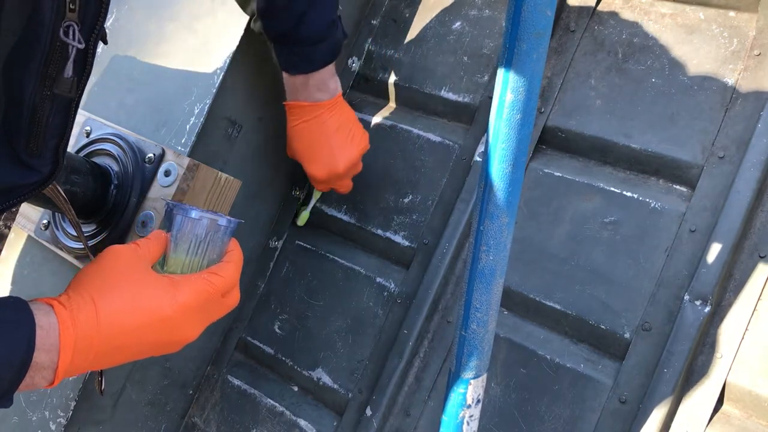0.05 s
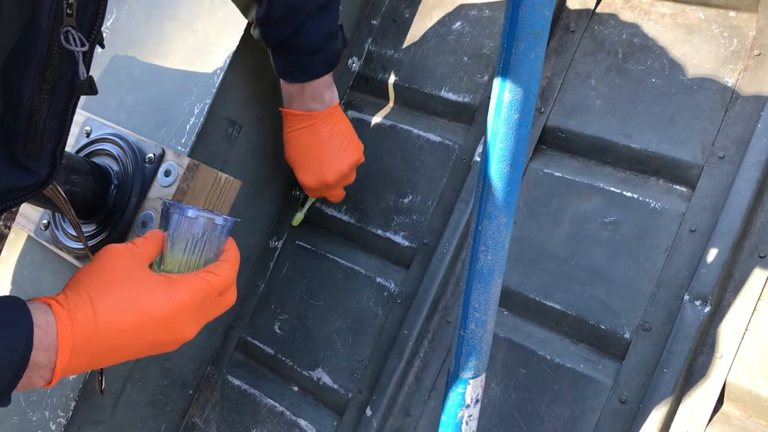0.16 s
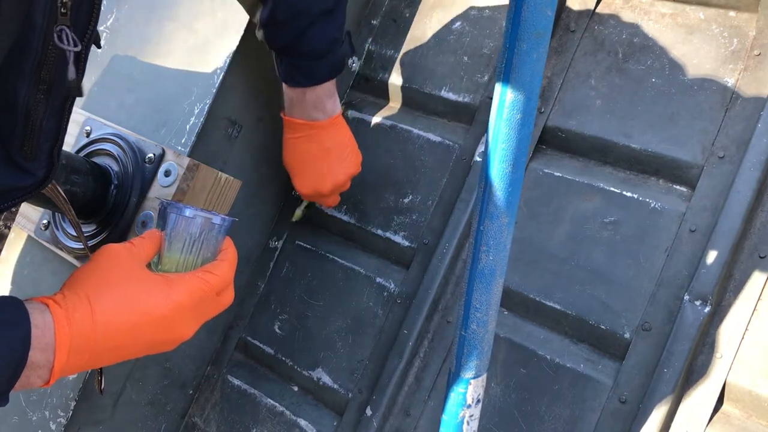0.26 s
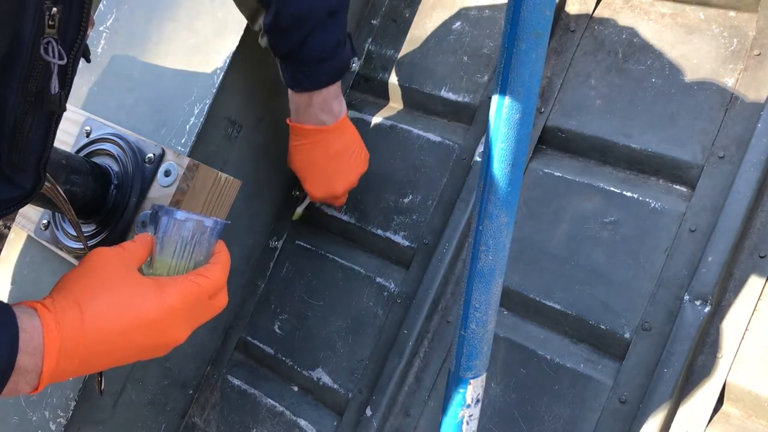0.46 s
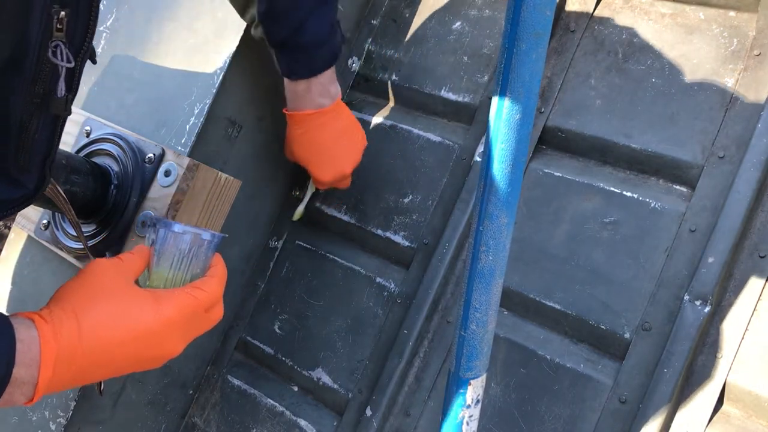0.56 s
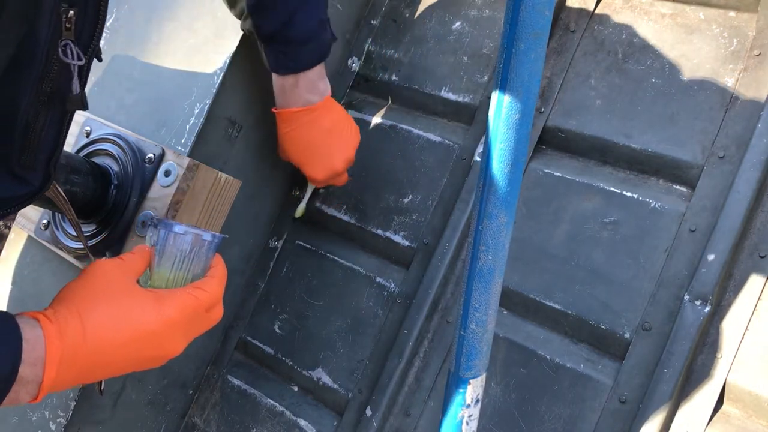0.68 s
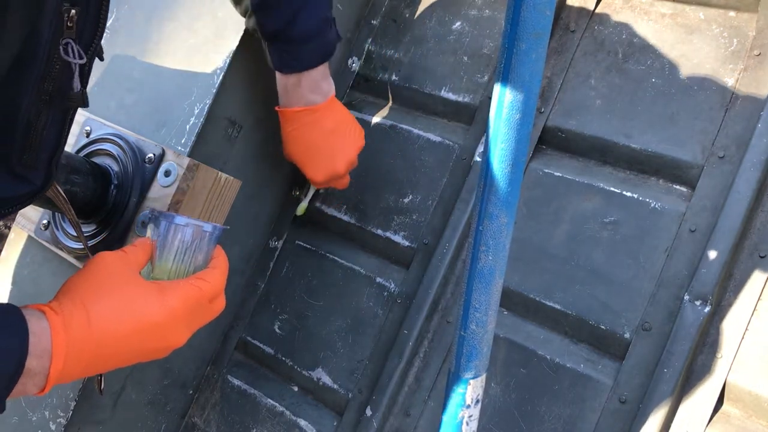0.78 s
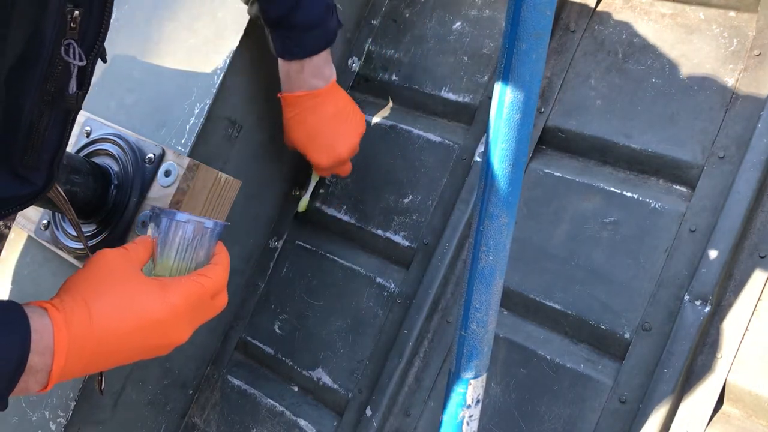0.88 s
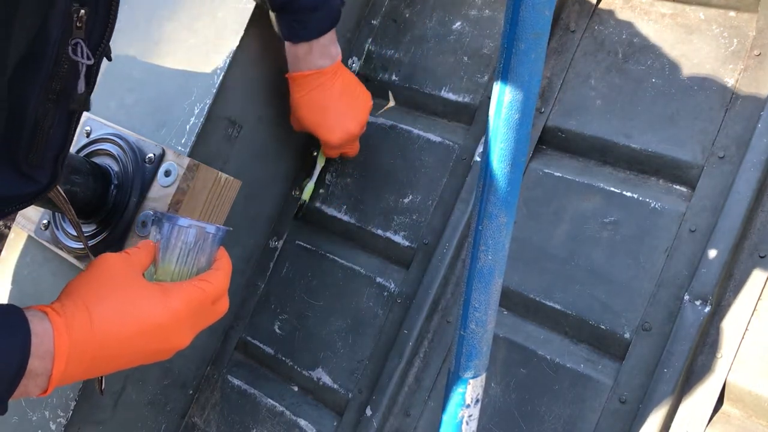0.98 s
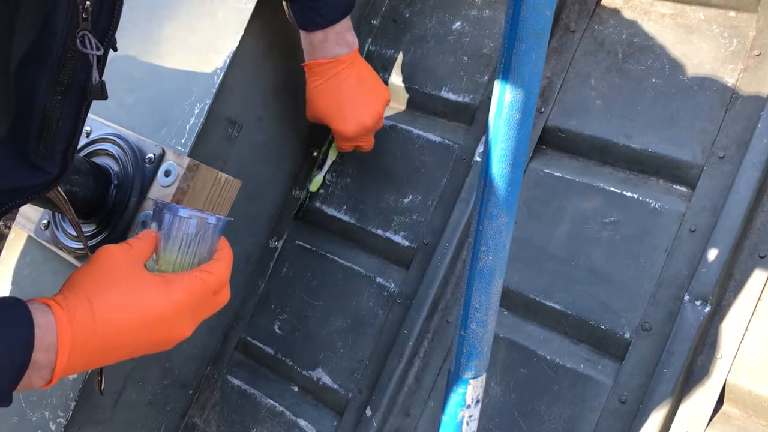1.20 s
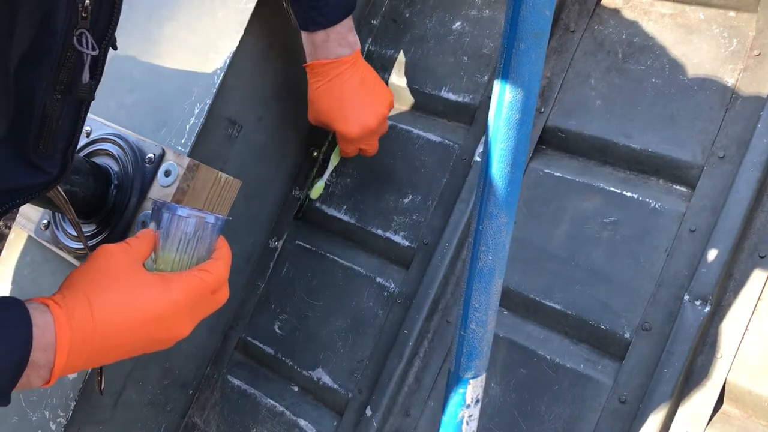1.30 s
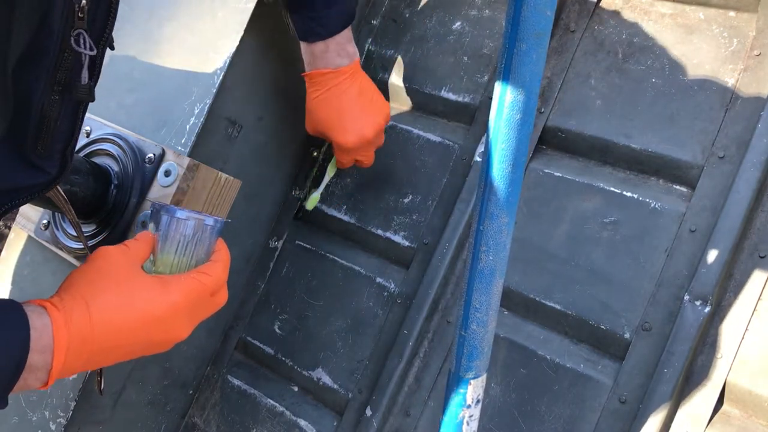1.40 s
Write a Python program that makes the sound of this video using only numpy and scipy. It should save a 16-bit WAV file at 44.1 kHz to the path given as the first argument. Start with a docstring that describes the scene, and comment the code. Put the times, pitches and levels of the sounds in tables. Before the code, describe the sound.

Close up in a soft outdoor setting, brush bristles scrape thin sheet metal in bursts with low hollow booms and tiny sticky snaps; later the metal collar rasps twice, and a faint ringing rub follows.

```python
"""An outdoor shop, with soft air: a stiff brush scrubs sticky epoxy along the ribs of an aluminium hull.
Random bristle slips excite the resonances of the sheet, the bristles and the tips; slower shoves boom the hull.
Glue ticks are decaying noise bands, handle knocks are pulses into hull modes, and catches jolt the sheet.
Twice the brush's metal collar rasps over a rib, driving narrow resonances; a faint ringing rub comes near
the end. One close microphone feeds both channels."""
import sys
import numpy as np
from scipy import signal
from scipy.fft import rfft, irfft, next_fast_len
from scipy.io import wavfile
from scipy.ndimage import uniform_filter1d

SR = 44100
rng = np.random.default_rng(int(sys.argv[2]) if len(sys.argv) > 2 else 0)


def ratio(d):
    """dB to gain"""
    e = np.asarray(d, float) / 20
    return 10 ** e


def waveform_to_disk(signal):
    """Save audio, clipped to [-1, 1], as 16-bit WAV at the path in sys.argv[1]."""
    frames = np.transpose(np.atleast_2d(signal))
    scaled = np.clip(frames, -1, 1) * 32767
    samples = np.round(scaled).astype(np.int16)
    wavfile.write(sys.argv[1], SR, samples)


N = 63945  # length [samples]


def unit(x):
    """Normalisation: scale to rms 1."""
    return x / np.sqrt(np.mean(x ** 2) + 1e-20)


def filtered(x, response):
    """Linear filtering: the spectrum of x times a complex response of frequency."""
    size = next_fast_len(x.shape[-1] + SR // 4)
    spectrum = rfft(x, size) * response(np.fft.rfftfreq(size, 1 / SR))
    return irfft(spectrum, size)[..., :x.shape[-1]]


def curve(points):
    """Zero-phase spectral shaping: (frequency [Hz], level [dB]) points joined on a log frequency axis."""
    hz, db = np.transpose(points)
    return lambda f: ratio(np.interp(np.log(f + 1), np.log(hz + 1), db))


def resonant(peaks):
    """Modal superposition: damped second-order resonances of alternating sign, causal."""
    def response(f):
        total = 0
        for k, (centre, width, db) in enumerate(peaks):
            damping = 1j * f * width
            total = total + (-1) ** k * ratio(db) * damping / (centre ** 2 - f ** 2 + damping)
        return total
    return response


def slips(rate, spread_db, smooth):
    """Stick-slip friction: random impulses (rate per s) of uneven size; smooth is the power share of even noise."""
    hit = rng.random(N) < rate / SR
    sizes = ratio(spread_db * rng.standard_normal(N))
    grains = unit(hit * rng.choice([-1, 1], size=N) * sizes)
    return np.sqrt(1 - smooth) * grains + np.sqrt(smooth) * rng.standard_normal(N)


def patchy(x):
    """Random modulation: bristles of different stiffness come and go in patches of time and frequency."""
    depth_db = 1  # rms of the gain
    z = signal.stft(x, nperseg=256)[2]
    across_hz = uniform_filter1d(rng.standard_normal(z.shape), 4, 0)
    field = uniform_filter1d(across_hz, 5, 1)
    return unit(signal.istft(z * ratio(depth_db * unit(field)), nperseg=256)[1][:N])


def swell(start, rise, hold, fall, db):
    """Envelope of a contact: smooth rise, hold and fall."""
    ramp = np.interp(np.arange(N) / SR, np.cumsum([start, rise, hold, fall]), [0, 1, 1, 0])
    return ratio(db) * np.sin(ramp * np.pi / 2) ** 2


def driven(gain, force, response):
    """Forced vibration: an enveloped force shakes a body whose output is rms 1 at steady gain 1."""
    return filtered(gain * force, response) / np.std(filtered(force, response))


# Spectrum of the background air: (frequency [Hz], relative density [dB per Hz])
AIR_SPECTRUM = [(15, -34), (25, 8.5), (87, 4), (195, -9.5), (415, -15), (816, -10.5), (2040, -26),
                (2680, -31), (10300, -37), (12800, -36.5), (15900, -35)]


def air():
    """Stationary noise: white noise shaped into the steady background of the place."""
    rms_db = -54
    return ratio(rms_db) * unit(filtered(rng.standard_normal(N), curve(AIR_SPECTRUM)))


# Glue ticks: (time [s], onset rms of the slow decay [dB], centre [Hz], slow decay T60 [s])
GLUE_TICKS = [(0.0634, -61.5, 4400, 0.026), (0.127, -64, 5730, 0.075), (.165, -61, 8000, 0.01),
              (0.207, -54, 4500, .03), (.2995, -47.5, 4000, 0.038), (0.3005, -49.5, 6130, 0.046),
              (0.302, -50, 9100, 0.034), (0.3524, -44, 9400, 0.017), (.352, -50.5, 4940, .03),
              (0.373, -56, 8700, 0.045), (0.6857, -42.5, 10900, 0.0077), (0.6886, -56, 5350, 0.017),
              (0.7245, -52, 5040, 0.044), (.914, -55, 5500, 0.048), (1.2747, -58.5, 7700, 0.047),
              (1.297, -58, 11300, 0.013), (1.3295, -52.5, 4440, 0.067), (1.3297, -58.5, 8700, 0.033),
              (1.4341, -62.5, 7800, .02)]


def ticks():
    """Sudden release: glue threads and bristles snap free as decaying noise bands with a sharp head."""
    width = 0.5  # of each of two cascaded resonances, over the centre
    snap_db, snap_t60_s = -1, 0.0013  # sharp head, level relative to the slow decay
    out, t = np.zeros(N + SR), np.arange(SR // 20) / SR
    for time, db, hz, t60 in GLUE_TICKS:
        band = resonant([(hz, width * hz, 0)])
        noise = unit(filtered(rng.standard_normal(len(t)), lambda f: band(f) ** 2))
        decay = ratio(-60 * t / t60) + ratio(snap_db - 60 * t / snap_t60_s)
        out[round(time * SR):][:len(t)] += noise * ratio(db) * decay
    return out[:N]


# Modes of the whole hull: (centre [Hz], width [Hz], relative level [dB])
HULL_MODES = [(61.3, 22.3, -5.5), (101, 25.6, 0.5), (165.6, 30.3, -1.5), (186.3, 26.7, -1.5),
              (252.2, 27.8, -8.5), (345, 180, -17.5)]
# Handle knocks: (time [s], peak level [dB])
HANDLE_KNOCKS = [(0.232, -34.5), (.256, -32), (0.298, -23), (.36, -35.5), (0.429, -36), (.677, -33),
                 (.737, -35.5), (0.877, -32), (1.166, -35.5), (1.185, -29)]


def knocks():
    """Impulse response: short soft pushes of the handle ring the hull modes."""
    push_s = 0.0066
    t = np.arange(SR // 5) / SR
    push = (t < push_s) * np.sin(np.pi * t / push_s) ** 2
    ring = filtered(push, resonant(HULL_MODES))
    blows = np.zeros(N)
    for time, db in HANDLE_KNOCKS:
        blows[round(time * SR)] = ratio(db)
    return signal.fftconvolve(blows, -ring / np.abs(ring).max())[:N]


# Faint ringing rub near the end: (start [s], rise [s], hold [s], fall [s], level [dB])
RINGING_RUB = (1.345, .006, .05, .025, -58)
# Resonances of the rib: (centre [Hz], width [Hz], relative level [dB])
RIB_MODES = [(1620, 60, 4.5), (3530, 220, -14.5), (4450, 130, -11)]


def rub():
    """Friction-driven resonance: sparser slips ring the rib."""
    return driven(swell(*RINGING_RUB), slips(630, 2.1, 0.33), resonant(RIB_MODES))


# Collar rasps: (start [s], rise [s], hold [s], fall [s], level [dB])
COLLAR_RASPS = [(1.012, 0.046, 0.029, 0.035, -38.5), (1.118, 0.06, 0.026, 0.028, -48.5)]
# Resonances of the metal collar on the rib: (centre [Hz], width [Hz], relative level [dB])
COLLAR_MODES = [(998, 32, -1), (1270, 40, 7), (1308, 67, 5.5), (1352, 82, 4.5), (1547, 73, -2),
                (1702, 38, -2.5), (1945, 49, -2.5), (2170, 54, -11.5), (2570, 170, -10), (3400, 95, -12.5)]
# High edge of the hardest rasp: (start [s], rise [s], hold [s], fall [s], level [dB])
RASP_EDGE = (1.035, .015, .04, .015, -52)
# Its resonance: (centre [Hz], width [Hz], relative level [dB])
EDGE_MODES = [(4340, 180, 0)]


def rasps():
    """Friction-driven resonance: metal on metal slips densely into narrow modes."""
    force = slips(900, 3.3, 0.61)
    strokes = sum(swell(*row) for row in COLLAR_RASPS)
    body = driven(strokes, force, resonant(COLLAR_MODES))
    edge = driven(swell(*RASP_EDGE), force, resonant(EDGE_MODES))
    return body + edge


# Broad response of the aluminium sheet: (frequency [Hz], relative density [dB per Hz])
SHEET_CURVE = [(180, 3.5), (300, 1.5), (420, -8.5), (735, -1), (825, -6), (1010, -5), (1640, -8.5),
               (3000, -31), (3900, -68), (6600, -120)]
# Modes added on that curve: (centre [Hz], width [Hz], level relative to the curve [dB])
SHEET_MODES = [(612, 20, -11), (717, 20, -9), (992, 20, 0.5), (1305, 33, 1), (1745, 27, -7),
               (1920, 20, -39), (2540, 30, 2)]


def sheet(f):
    """Plate response: a broad curve with added modes, weakening below 200 Hz."""
    return curve(SHEET_CURVE)(f) * (1 + resonant(SHEET_MODES)(f)) * np.clip(f / 200, 0, 1) ** 2


# Bristle bunches catch on the sheet: (time [s], starting drive level [dB])
BRISTLE_CATCHES = [(.3, -50.5), (0.309, -42), (.321, -38.5), (0.334, -37.5), (.679, -49), (.689, -51),
                   (0.726, -38), (.737, -45), (0.778, -49)]


def catches():
    """Transient excitation: each catch is a short, rough, decaying jolt of the sheet."""
    t60_s = 0.049
    t, jolt = np.arange(N) / SR, np.zeros(N)
    for time, db in BRISTLE_CATCHES:
        jolt += (t >= time) * ratio(db - 60 * np.clip(t - time, 0, 1) / t60_s)
    return driven(jolt, slips(1200, 8.8, 0.48), sheet)


def hull_boom(gain):
    """Low modal excitation: sparse uneven shoves shake the whole hull."""
    return driven(gain, slips(150, 4.5, 0.63), resonant(HULL_MODES))


# Spectrum of the tip hiss: (frequency [Hz], relative density [dB per Hz])
TIP_SPECTRUM = [(4410, -7), (7500, -4), (9470, -0.5), (10400, -8), (12600, -0.5), (15900, -7)]


def tip_hiss(gain):
    """Friction noise: dense slips of the bristle tips make a high hiss."""
    return driven(gain, patchy(slips(1700, 4.5, 0.65)), curve(TIP_SPECTRUM))


# Spectrum of the bristle rasp: (frequency [Hz], relative density [dB per Hz])
BRISTLE_SPECTRUM = [(1470, -32), (2500, -2), (3050, -4), (3980, -4), (4340, -3.5), (4800, -11),
                    (6070, -7.5), (7500, -17), (9750, -70), (16500, -120)]


def bristle_rasp(gain, force):
    """Friction noise: the slip force shaped by the spectrum of the bristles."""
    return driven(gain, force, curve(BRISTLE_SPECTRUM))


# Brush strokes: (time [s], scrape level [dB], then levels relative to the scrape:
# hull boom [dB], bristle rasp [dB], tip hiss [dB])
BRUSH_STROKES = [(0.0, -70, 6, 3.5, 1), (0.02, -67, 7, -20.5, -12), (0.092, -68, 16.5, -7.5, -9),
                 (0.188, -63, 8.5, -7, -9), (0.2, -63, 6, 4.5, 5), (0.226, -48.5, 9.5, -5.5, -9.5),
                 (0.262, -45, 0, -14.5, -20), (0.29, -58.5, 12, -21, -27), (0.302, -44, 9, -5, -19),
                 (0.342, -41, 1, -16, -19), (0.35, -45, 11, -22, -26), (0.394, -59.5, 8.5, -19, -10),
                 (0.424, -53.5, 10, -18, -16), (0.456, -61.5, 14, -10, -6), (0.492, -60.5, 3.5, -5.5, -5),
                 (0.654, -59, 10, -12, -12), (0.666, -73, 19, 0, 7), (0.682, -43, -9, -13.5, -15),
                 (0.694, -43, -9, -12.5, -21), (0.702, -45.5, 6, -15, -16), (0.86, -59.5, 11, -10, -13.5),
                 (0.892, -46, 6.5, -12, -18), (0.944, -43, -0.5, -22.5, -22), (0.992, -56.5, 8.5, -4, -1),
                 (1.058, -38.5, -3.5, -9.5, -16), (1.082, -39, -10, -14.5, -15),
                 (1.134, -43, -2, -14, -16.5), (1.202, -42.5, 4.5, -13, -21.5), (1.226, -43, -28, -23, -22),
                 (1.234, -49, -4, -19, -23), (1.284, -57, 8.5, -17.5, -11), (1.328, -57.5, 5.5, -9, -12),
                 (1.4, -66, 12, -13, -26), (1.45, -56.5, 3.5, -17, -29)]


def brush():
    """Common excitation: one slip force drives sheet and bristles; boom and hiss follow the same strokes."""
    time, *columns = np.transpose(BRUSH_STROKES)
    t = np.arange(N) / SR
    scrape_db, boom_db, rasp_db, hiss_db = [np.interp(t, time, c) for c in columns]
    force = patchy(slips(1400, 3.5, 0.55))
    scrape = driven(ratio(scrape_db), force, sheet)
    boom = hull_boom(ratio(scrape_db + boom_db))
    rasp = bristle_rasp(ratio(scrape_db + rasp_db), force)
    hiss = tip_hiss(ratio(scrape_db + hiss_db))
    return scrape + boom + rasp + hiss


def scene():
    """Superposition: all sources add at one microphone that feeds both channels."""
    mono = air() + ticks() + knocks() + rub() + rasps() + catches() + brush()
    return np.array([mono, mono])


def band_limit(x):
    """A steep low-pass at the top of the band."""
    return signal.sosfilt(signal.butter(12, 16090, fs=SR, output="sos"), x)


def record(dry):
    """Band limitation: the microphone's second-order bass roll-off and a sharp upper limit."""
    low_hz, top_hz = 45.7, 15860  # corner of each first-order stage; upper limit
    mix = filtered(dry, lambda f: (f < top_hz) * (1j * f / (low_hz + 1j * f)) ** 2)
    return band_limit(mix)


dry = scene()
out = record(dry)
waveform_to_disk(out)
```